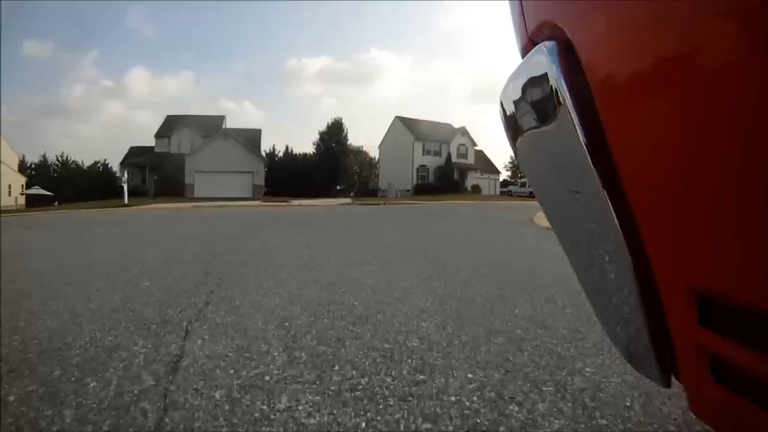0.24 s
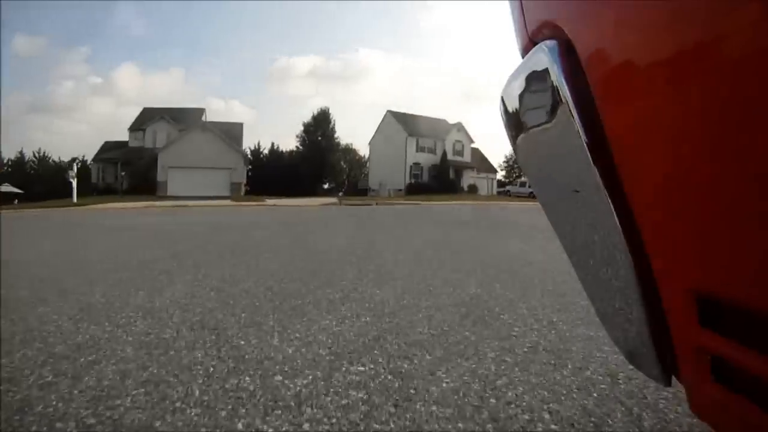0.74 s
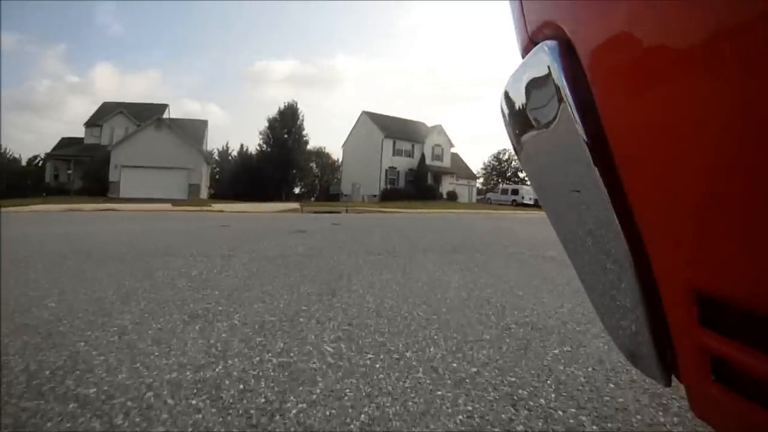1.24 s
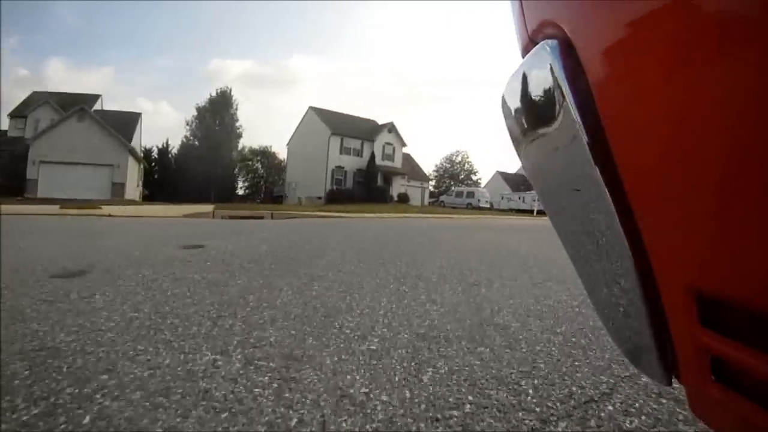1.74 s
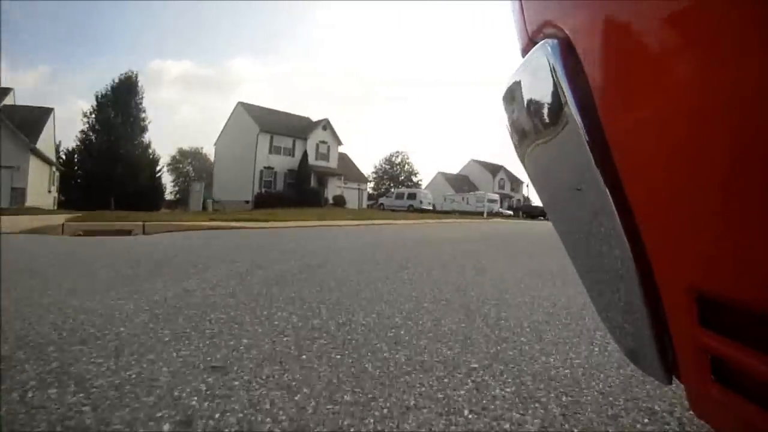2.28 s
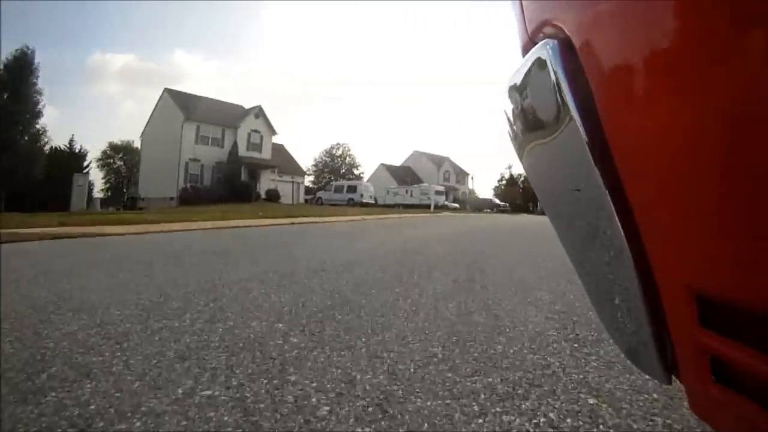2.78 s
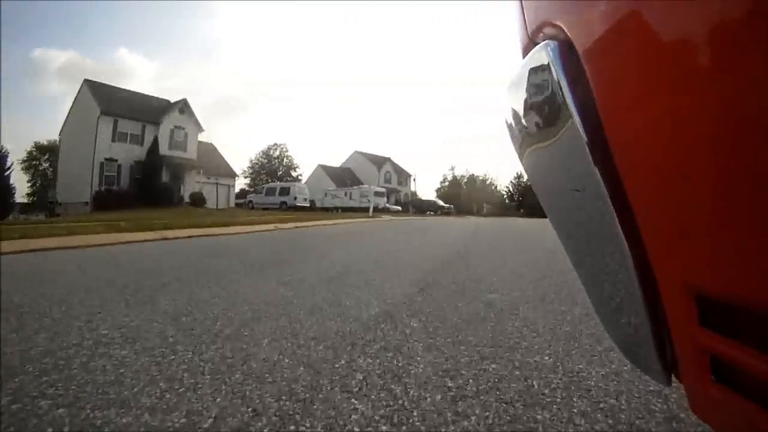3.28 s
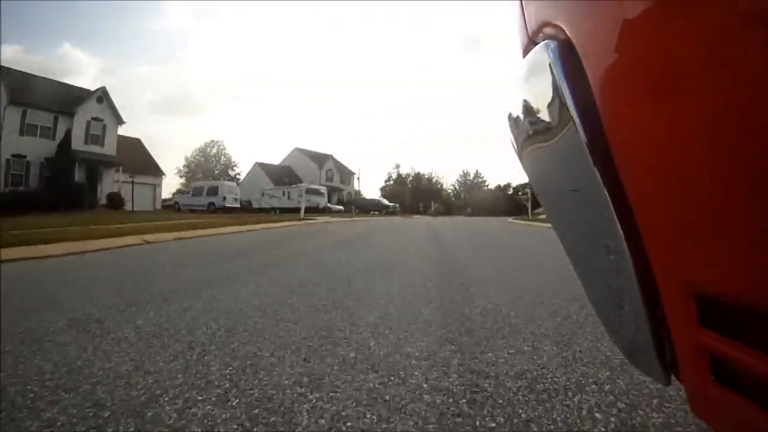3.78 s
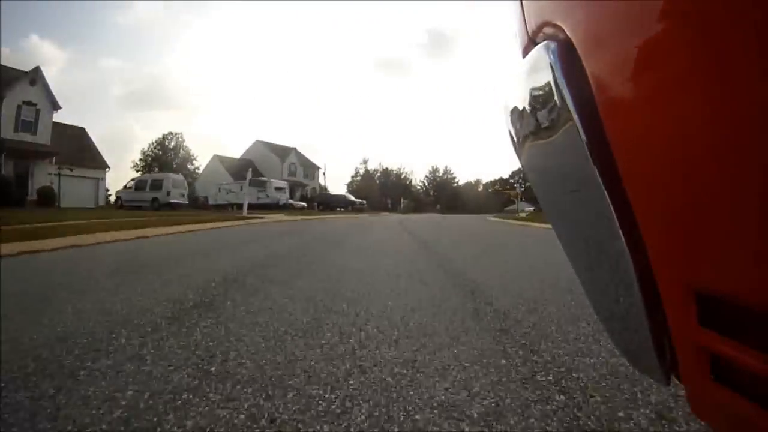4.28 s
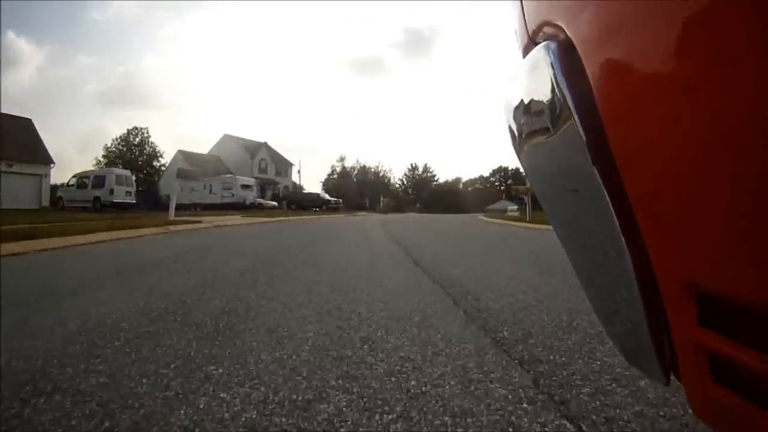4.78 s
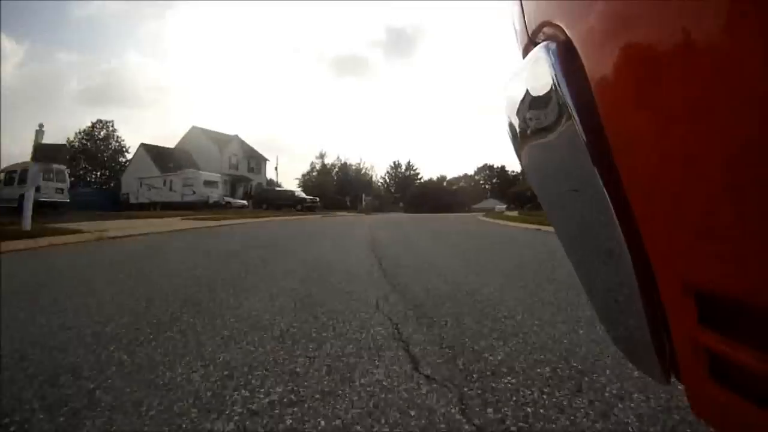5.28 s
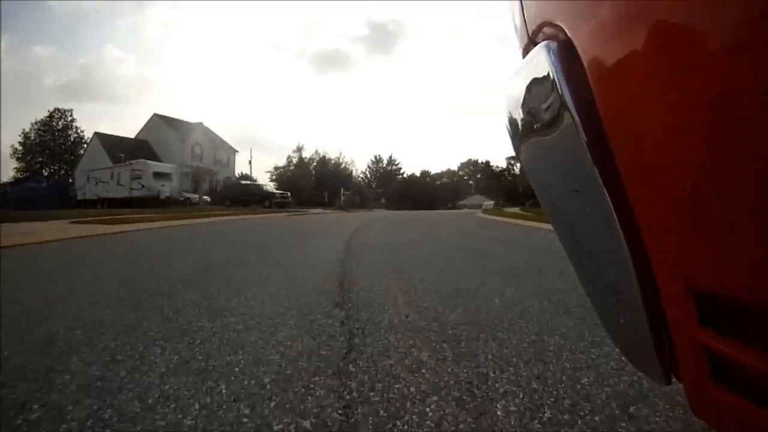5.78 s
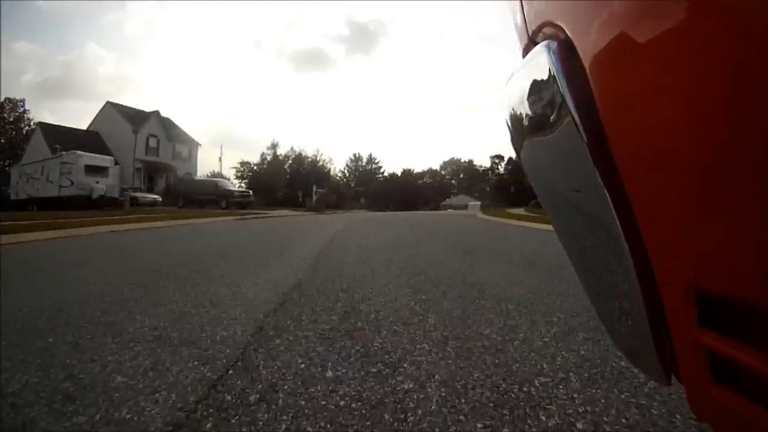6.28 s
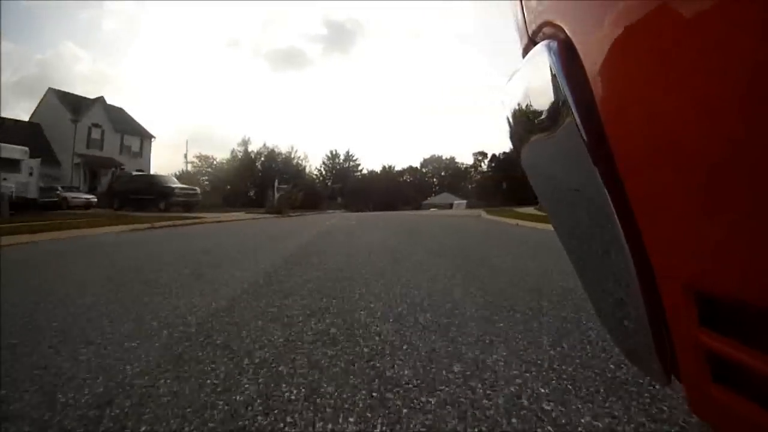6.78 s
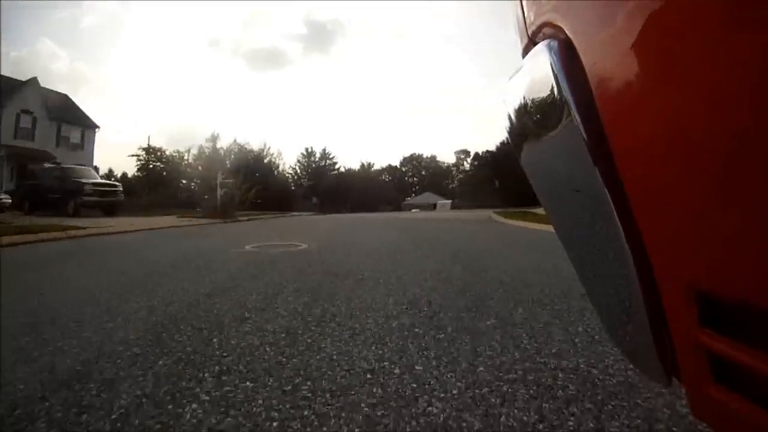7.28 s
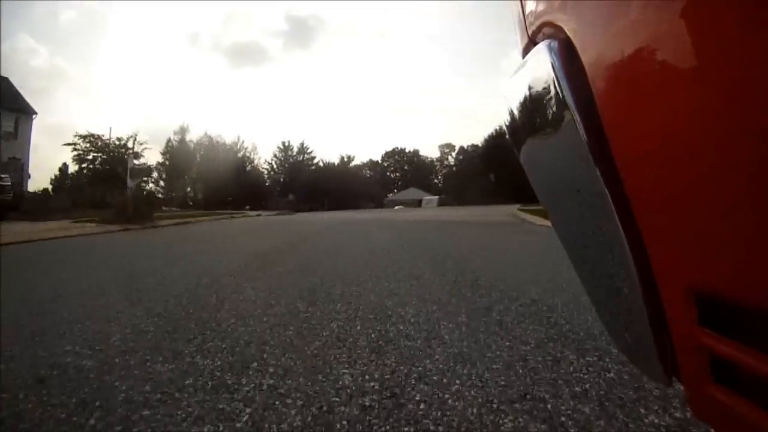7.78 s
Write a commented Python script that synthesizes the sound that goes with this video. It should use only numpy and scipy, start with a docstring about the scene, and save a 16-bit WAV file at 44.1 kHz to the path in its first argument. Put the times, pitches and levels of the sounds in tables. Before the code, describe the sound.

A turbocharged V8 idles with a deep, uneven, loping throb, heard close up from low on the car's side. A soft hiss of air fades in the first half second, and a few faint spits come around 2 seconds. At about 2.4 seconds the engine pulls away: the revs lift, dip briefly just after 3 seconds, then climb steadily into a low, pulsing growl with a little rasp and hiss. From about 4.3 seconds a thin turbo whistle rises, peaks near 5.6 seconds and slowly sinks, while the revs keep edging up. At 7 seconds the throttle shuts and the engine coasts, burbling and falling slightly in pitch, as the whistle and airy hiss grow more noticeable until the end at about 8 seconds. A quiet road rumble lies underneath throughout.

```python
"""A low, loping throb: a turbocharged V8 idles, heard from low on the car's flank, then pulls away and
coasts with the throttle shut. The near cylinder bank fires unevenly into its pipe, and each pressure
pulse brings a puff of turbulent gas that burbles, rasps and hisses. The turbo whistles up and down;
the road rumbles beneath. A slow sample-and-hold converter mirrors the sound faintly into the treble."""
import sys
import numpy as np
from scipy import signal
from scipy.fft import rfft, irfft, next_fast_len
from scipy.io import wavfile
from scipy.ndimage import uniform_filter1d, map_coordinates

SR = 44100
rng = np.random.default_rng(int(sys.argv[2]) if len(sys.argv) > 2 else 0)


def unload_audio(sound):
    """Save the sound as a 16-bit wav file, at the path given as the first command line argument."""
    columns = np.transpose(np.atleast_2d(sound))
    # keep every value between -1 and 1, then stretch to whole-number steps
    steps = np.round(np.clip(columns, -1, 1) * 32767)
    wavfile.write(sys.argv[1], SR, steps.astype(np.int16))


N = 354123
T = np.arange(N) / SR

# crank speed: time_s, speed_rpm
CRANK_SPEED = [(0.0, 711.6), (0.54, 641.2), (1.49, 887.4), (1.82, 860.3), (2.32, 739.7), (2.75, 1242.6),
               (2.99, 1283.8), (3.23, 1129.3), (3.68, 1239.6), (4.04, 1340.0), (4.49, 1519.7),
               (5.4, 1929.2), (5.95, 2075.2), (6.97, 2181.3), (7.21, 1964.7), (7.27, 2103.7),
               (8.03, 1879.8)]
# relative strengths of a cycle's eight firings: idle_size, load_size, coast_size, bark_size
FIRINGS = [(0.16, 0.17, -0.23, 0.15), (0.59, 1.34, 0.72, 0.44), (-0.11, -0.018, -0.18, 0.13),
           (0.34, 0.63, 0.51, 0.83), (0.18, 0.91, 0.36, 0.47), (-0.28, 0.37, 0.19, 0.22),
           (0.77, 1.23, 0.97, 0.82), (0.11, -0.47, -0.44, 0.37)]
# gas escaping at each firing: idle_db, load_db, coast_db
PUFFS = [(-3, -3, 0), (-5, -2, -4.5), (-5.5, -6, -1.5), (-1.5, -2, 0.5), (-1.5, 0, -8), (3.5, -5.5, 0),
         (-2.5, 0.5, -1), (-4.5, -6.5, -1)]
# spectra of one exhaust pulse (cool and hot are under load): frequency_hz, level_db
IDLE_PULSE = [(20, -3.5), (32, -23), (48, 5.5), (100, 3), (150, -2.5), (190, 2), (215, -2.5), (260, -19),
              (320, -19.5), (430, -22.5), (800, -30), (1500, -40.5), (5000, -64)]
COOL_PULSE = [(25, -58), (42, -9.5), (66, 6), (88, -7), (120, 5.5), (157, -1), (185, 5), (205, 10.5),
              (240, -1), (280, -5), (330, -22.5), (440, -18), (800, -31.5), (1500, -70)]
HOT_PULSE = [(28, -67), (50, -8.5), (82, 5.5), (115, -8.5), (150, -3), (180, 2), (222, 8), (275, -3.5),
             (315, -15), (385, -24), (480, -13.5), (560, -23), (700, -23), (1200, -54.5)]
COAST_PULSE = [(20, -17), (35, -35), (52, 2.5), (108, -1.5), (124, 2), (150, 7), (200, 1.5), (240, -5.5),
               (285, -14), (440, -32), (600, -35.5), (1500, -74.5)]
# spectral shapes of turbulent gas: frequency_hz, level_db
BURBLE = [(20, -35), (48, -12), (90, -11), (150, -7), (195, 7), (240, -0.5), (310, -17.5), (400, -18),
          (700, -81)]
IDLE_RASP = [(250, -36), (340, -14), (450, 5.5), (520, -9.5), (600, 7), (720, -7), (880, -0.5),
             (1050, -21.5), (1300, -14), (1800, -30.5)]
COAST_RASP = [(250, -1.5), (350, -10), (440, 9.5), (520, -13), (620, 0), (760, -10), (1000, -10.5),
              (1400, -18), (1900, -25.5)]
IDLE_HISS = [(530, -56), (900, -6.5), (1010, -23), (1190, -1), (1480, -22), (1660, -6), (2550, -10),
             (2870, -7), (3420, -20.5), (4260, -20), (4880, -11.5), (6000, -43), (7800, -68), (13200, -120)]
LOAD_HISS = [(530, -10), (900, -4.5), (1090, 0.5), (1190, -7.5), (1440, -3.5), (1630, -12), (1820, 1.5),
             (1970, -2.5), (2470, -4.5), (2670, -1.5), (3390, -8.5), (3670, -13.5), (4160, -9), (4800, -12),
             (6000, -18.5), (7800, -46), (13200, -120)]
# upper resonances of the pipe, and those of the intake: pitch_hz, width_hz, level_db
PIPE_MODES = [(418, 34, -5), (466, 78, -2.5), (600, 45, -2.5), (663, 38, 5.5), (697, 26, 6), (831, 62, -8),
              (1060, 73, -29.5)]
INTAKE_MODES = [(1703, 57, -0.5), (1820, 110, -5.5), (1680, 46, -19), (2106, 43, -6.5), (2800, 190, -7.5),
                (3250, 250, -13.5), (4795, 198, -4), (1290, 320, -13.5)]
# passing pipe and shield resonances: start_s, end_s, pitch_hz, width_hz, level_db
RINGS = [(-0.3, 0.39, 615, 69, -31.5), (-0.5, 3.9, 465, 27, -39.5), (2.5, 3.0, 2835, 74, -41.5),
         (2, 3.65, 2800, 89, -46), (4.5, 4.85, 1820, 42, -49)]
# spits of air: peak_s, level_db, sigma_s
SPITS = [(0.072, -26, 0.0064), (0.1, -39, 0.0066), (1.706, -36, 0.0067), (1.988, -38, 0.0059),
         (2.29, -37, 0.0084), (2.44, -34.5, 0.0025)]
# how hard the engine pulls: time_s, effort_share
EFFORT = [(2.42, 1), (2.8, 1), (3.3, 0.33), (3.85, 0.8), (5.3, 1), (5.65, 0.08), (6.1, 0.48), (6.9, 0.77)]
# the turbo's whistle: time_s, pitch_hz
TURBO_PITCH = [(4.3, 1088), (5.28, 1875), (5.65, 2000), (6.1, 1874), (7.0, 1649), (7.33, 1590),
               (8.03, 1612)]
# base levels of the layers: idle_db, load_db, coast_db
BOOM_DB = (-16.5, -15.5, -15)
RASP_DB = (-34.5, -30, -33)
HISS_DB = (-44.5, -46.5, -35)
WHISTLE_DB = (-60, -49.5, -41)

PULL_S, LOAD_LAG_S = 2.39, 0.39
SHUT_S, SHUT_FADE_S, SHUT_SHARE = 6.98, 0.15, 0.87
COOL_RPM, HOT_RPM = 1256, 2044


def amp(db):
    """Amplitude grows tenfold for every 20 dB."""
    return 10 ** (np.asarray(db) / 20)


def unit(x):
    """Normalisation to an overall rms of 1."""
    return x / np.sqrt(np.mean(x ** 2) + 1e-20)


def steady(x):
    """Normalisation to rms 1 over a few engine cycles, which keeps the throb."""
    power = uniform_filter1d(uniform_filter1d(x ** 2, size=SR // 3), size=SR // 6)
    return x / np.sqrt(np.abs(power) + 1e-12)


def ramp(x, start, length):
    """A linear rise from 0 at start to 1 over length."""
    return np.clip((x - start) / length, 0, 1)


def curve(rows, at=T):
    """Linear interpolation of (time_s, value) rows."""
    return np.interp(at, *np.transpose(rows))


def wobble(rate_hz):
    """Smooth random fluctuation: a spline through rate_hz knots a second."""
    return map_coordinates(rng.standard_normal(int(N * rate_hz / SR) + 4), [T * rate_hz])


def colour(points):
    """A spectral envelope, straight in decibels against log frequency between points."""
    knots_hz, db = np.transpose(points)
    return lambda hz: amp(np.interp(np.log(hz + 1), np.log(knots_hz), db))


def resonances(modes):
    """Superposition of damped resonators, alternating in sign."""
    return lambda f: sum((-1) ** k * amp(db) * 1j * f * width / (hz * hz - f * f + 1j * f * width)
                         for k, (hz, width, db) in enumerate(modes))


def filtered(x, response):
    """A linear filter multiplies the spectrum by its frequency response."""
    size = next_fast_len(N + SR // 2)
    return irfft(rfft(x, size) * response(np.fft.rfftfreq(size, 1 / SR)), size)[:N]


def noise(response):
    """White noise takes on the spectrum of its filter; rms 1."""
    return unit(filtered(rng.standard_normal(N), response))


def pulse(points, age_s):
    """Folding the cepstrum gives the causal, minimum-phase pulse with this spectrum."""
    size = 2 ** 15
    cepstrum = irfft(np.log(colour(points)(np.fft.rfftfreq(size, 1 / SR))))
    cepstrum[1:size // 2] *= 2
    cepstrum[size // 2 + 1:] = 0
    return np.interp(age_s * SR, np.arange(size), irfft(np.exp(rfft(cepstrum))), left=0)


def states(at=T):
    """Shares of idle, load and coast: load builds with a first-order lag until the throttle shuts."""
    coast = SHUT_SHARE * ramp(at, SHUT_S, SHUT_FADE_S)
    load = (1 - np.exp(-np.maximum(at - PULL_S, 0) / LOAD_LAG_S)) * (1 - coast)
    return 1 - load - coast, load, coast


def heat(at=T):
    """The share of hot gas in the pipe rises with crank speed."""
    return ramp(curve(CRANK_SPEED, at), COOL_RPM, HOT_RPM - COOL_RPM)


def level(state_db, effort_db=0, hot_db=0):
    """Gain from a blend of levels in decibels; under load, effort and heat add to it."""
    idle, load, coast = states()
    extra_db = load * (effort_db * curve(EFFORT) + hot_db * heat())
    return amp(np.dot(state_db, [idle, load, coast]) + extra_db)


def crank():
    """Phase is the integral of speed: the firing count, four a revolution, with times and cylinders."""
    count = np.cumsum(curve(CRANK_SPEED)) / SR * 4 / 60
    number = np.arange(1, int(count[-1]))
    return count, np.interp(number, count, T), number % len(FIRINGS)


def gas_flow(count, throb_db, flicker_db, lead_firings=0.17, opening_s=0.0074):
    """Valves modulate the flow in puffs, which decay for positive throb_db and swell for negative."""
    number, age = np.divmod(count + lead_firings, 1)
    puffs_db = np.transpose(PUFFS)[:, number.astype(int) % len(PUFFS)]
    cylinder_db = np.sum(np.array(states()) * puffs_db, axis=0)
    puff = uniform_filter1d(amp(cylinder_db - 2 * throb_db * age), size=int(opening_s * SR))
    return puff * amp(flicker_db * wobble(130))


def surge(count, depth_db, crest):
    """Amplitude modulation: close firings crowd the pipe once a cycle, adding depth_db at firing crest."""
    return amp(depth_db * np.cos(2 * np.pi * (count - crest) / len(PUFFS)))


def boom(times, cylinder, lead_s=0.00049):
    """Pressure pulses superpose, one a firing; when coasting the cylinders suck and the sign inverts."""
    idle, load, coast = (share[:, None] for share in states(times))
    scatter = (0.15 * idle + 0.0078 * load + 0.022 * coast) * rng.standard_normal((len(times), 1))
    idle_size, load_size, coast_size, _ = (np.array(FIRINGS)[cylinder] + scatter).T[:, :, None]
    onset_s = (times - lead_s)[:, None]
    index = np.maximum(onset_s * SR, 0).astype(int) + np.arange(SR // 14)
    age_s = index / SR - onset_s
    hot = heat(times)[:, None]
    waves = 1.94 * idle * idle_size * pulse(IDLE_PULSE, age_s)
    waves += load * load_size * ((1 - hot) * pulse(COOL_PULSE, age_s) + hot * pulse(HOT_PULSE, age_s))
    waves -= 1.75 * coast * coast_size * pulse(COAST_PULSE, age_s)
    return steady(np.bincount(index.ravel(), waves.ravel(), N)[:N])


def burble(count):
    """Turbulence in each puff radiates low noise, strongest at idle."""
    idle, load, coast = states()
    gas = steady(gas_flow(count, throb_db=-1.5, flicker_db=2.5) * noise(colour(BURBLE)))
    return (0.64 * idle + 0.12 * load + 0.27 * coast) * gas


def rasp(count, times, cylinder, scatter_db=3.0, grit_hot_db=-4):
    """Turbulent gas rushes through the pipe; under load it and the pulse fronts excite the upper modes."""
    idle, load, coast = states()
    sizes = np.array(FIRINGS)[cylinder, -1] * amp(scatter_db * rng.standard_normal(len(times)))
    fronts = np.bincount((times * SR).astype(int), sizes, N)
    swell = surge(count, depth_db=3.5, crest=5.7)
    bark = steady(swell * filtered(fronts, resonances(PIPE_MODES)))
    flow = gas_flow(count, throb_db=-1.5, flicker_db=1)
    grit = steady(swell * filtered(flow * rng.standard_normal(N), resonances(PIPE_MODES)))
    rush = steady(surge(count, depth_db=1.5, crest=5.3) * flow * noise(colour(IDLE_RASP)))
    sigh = steady(flow * noise(colour(COAST_RASP)))
    growl = pitch_bend(0.55 * bark + 0.62 * amp(grit_hot_db * heat()) * grit, count)
    return 0.95 * idle * rush + load * growl + 1.08 * coast * sigh


def pitch_bend(x, count, swing_s=0.00038, crest=5.79):
    """Phase modulation: each surge of gas speeds sound through the pipe, bending its ring once a cycle."""
    return np.interp(T + swing_s * np.cos(2 * np.pi * (count - crest) / len(PUFFS)), T, x)


def hiss(count):
    """Turbulence hisses in puffs, sharper under load; air excites the intake's modes, most when coasting."""
    idle, load, coast = states()
    soft = steady(gas_flow(count, throb_db=-0.5, flicker_db=2.0))
    sharp = steady(gas_flow(count, throb_db=5.5, flicker_db=2.0))
    exhaust = 1.72 * idle * soft * noise(colour(IDLE_HISS))
    exhaust += 1.65 * load * sharp * noise(colour(LOAD_HISS))
    intake = (0.83 * load + 1.23 * coast) * sharp * noise(resonances(INTAKE_MODES))
    return exhaust + intake


def rings(count, fade_s=0.12):
    """Forced vibration: puffs of gas shake narrow pipe and shield resonances, each for a set time."""
    flow = gas_flow(count, throb_db=2.0, flicker_db=0) * surge(count, depth_db=1.5, crest=4.6)
    sound = np.zeros(N)
    for start_s, end_s, hz, width_hz, db in RINGS:
        swell = ramp(np.minimum(T - start_s, end_s - T), 0, fade_s)
        mode = resonances([(hz, width_hz, 0)])
        ringing = filtered(flow * rng.standard_normal(N), lambda f: mode(f) ** 2)
        sound += amp(db) * swell * steady(ringing)
    return sound


def boost_vent(count, hold_s=0.26, fade_s=0.2):
    """The last boost pressure escapes as turbulent hiss while the engine settles into idle."""
    air = steady(gas_flow(count, throb_db=5.0, flicker_db=1.0)) * noise(colour(LOAD_HISS))
    return amp(-37) * (1 - ramp(T, hold_s, fade_s)) * air


def road_rumble():
    """Stationary broadband noise, with its power mostly at low frequencies."""
    return amp(-37) * noise(colour([(20, -16), (80, -2), (300, -4.5), (1000, -20), (5000, -35)]))


def spits():
    """Brief spits of air: Gaussian bursts of noise coloured by some of the intake's modes."""
    bursts = sum(amp(db) * np.exp(-0.5 * ((T - peak_s) / sigma_s) ** 2) for peak_s, db, sigma_s in SPITS)
    return bursts * noise(resonances(INTAKE_MODES[3:]))


def turbo(count, spool_s=4.32, calm_s=5.8, spool_db=6, duct_hz=1840, duct_half_width_hz=60, duct_db=7):
    """Modulation by exhaust pulses smears the spooling whistle; it swells crossing a duct resonance."""
    hz = curve(TURBO_PITCH)
    duct = amp(duct_db / (1 + ((hz - duct_hz) / duct_half_width_hz) ** 2))
    flutter = 1 - 0.9 * ramp(T, calm_s, 0.73)  # smeared share of the power, falling as the turbo slows
    gain = level(WHISTLE_DB) * duct * amp(spool_db * flutter) * ramp(T, spool_s, 0.34)
    phase = 2 * np.pi * np.cumsum(hz + 1.4 * wobble(25)) / SR
    chop = surge(count, depth_db=-0.5, crest=7.6) * gas_flow(count, throb_db=-7, flicker_db=4.5)
    smear = unit(chop * (wobble(90) * np.sin(phase) + wobble(90) * np.cos(phase)))
    tone = unit(surge(count, depth_db=0.5, crest=4.4) * np.sin(phase))
    return gain * (np.sqrt(1 - flutter) * tone + np.sqrt(flutter) * smear)


def scene():
    """Sound pressures add: exhaust, rushing air, turbo and road sum in one channel."""
    count, times, cylinder = crank()
    exhaust = level(BOOM_DB) * steady(burble(count) + boom(times, cylinder))
    exhaust += level(RASP_DB, hot_db=1) * rasp(count, times, cylinder)
    air = level(HISS_DB, effort_db=5.5) * hiss(count) + turbo(count)
    air *= amp(2.5 * np.maximum(T - SHUT_S, 0))  # swells 2.5 dB a second as the car coasts
    return (exhaust + air + road_rumble() + rings(count) + spits() + boost_vent(count))[None]


def record(dry):
    """A zero-order hold mirrors the spectrum about its sampling rate; a band limit follows."""
    hold_hz, top_hz, oversample = 12000, 15330, 16
    held = np.repeat(signal.resample_poly(dry[0], hold_hz, SR), oversample)
    sound = signal.resample_poly(held, SR, oversample * hold_hz)[:N]
    return filtered(sound, lambda hz: (hz < top_hz) * ramp(hz, 8, 14))[None]


dry = scene()
out = record(dry)
unload_audio(out)
```